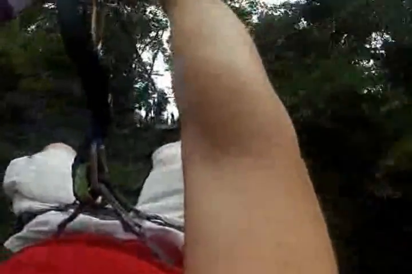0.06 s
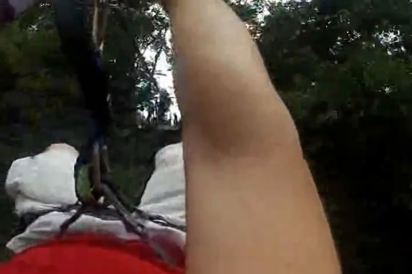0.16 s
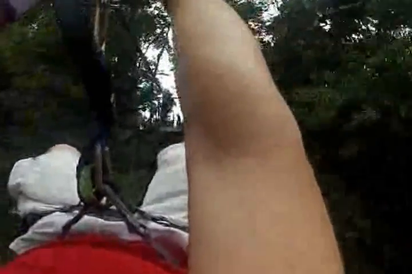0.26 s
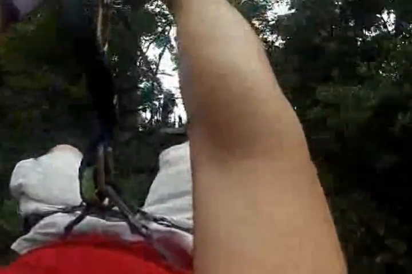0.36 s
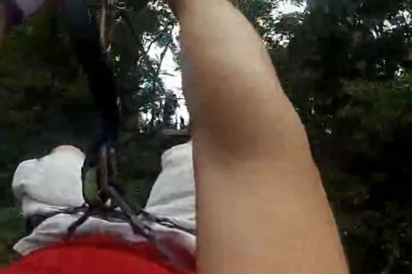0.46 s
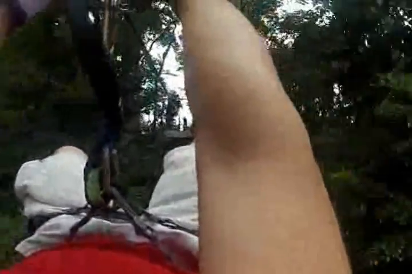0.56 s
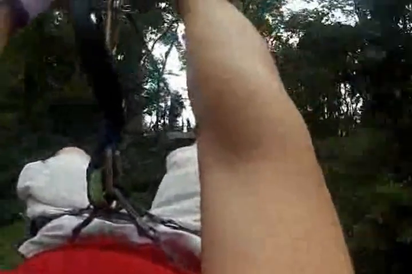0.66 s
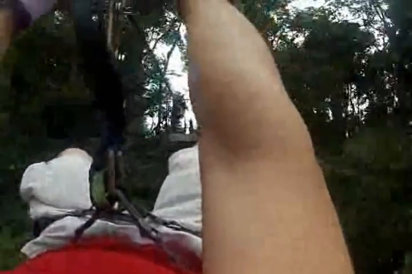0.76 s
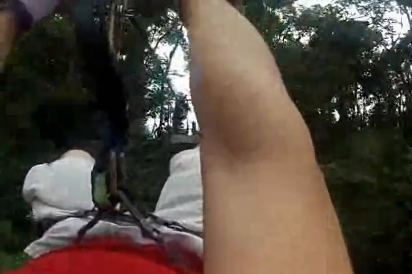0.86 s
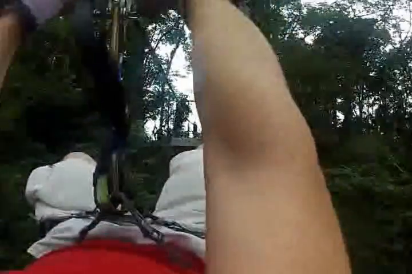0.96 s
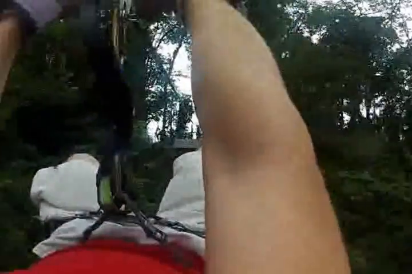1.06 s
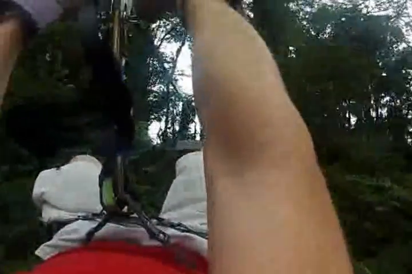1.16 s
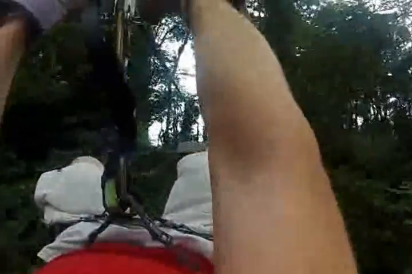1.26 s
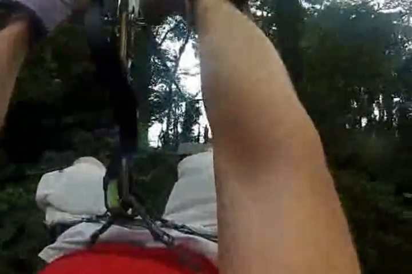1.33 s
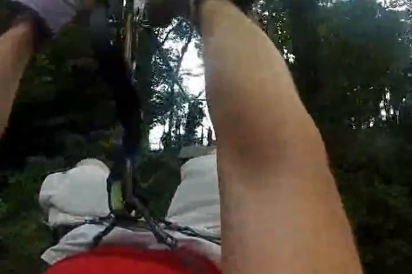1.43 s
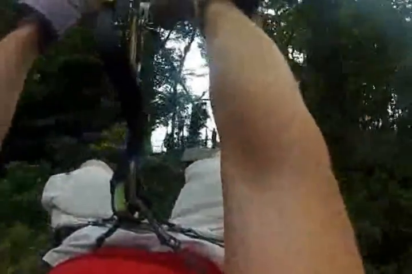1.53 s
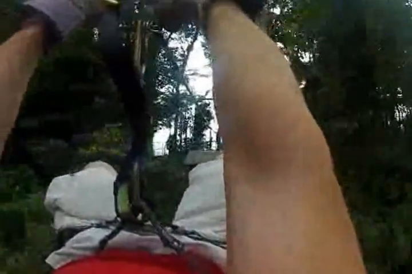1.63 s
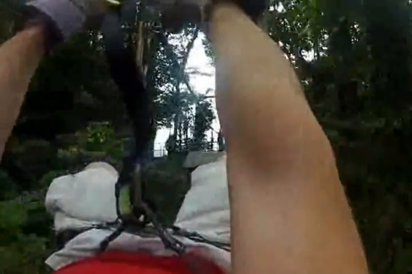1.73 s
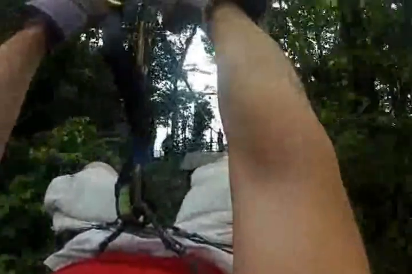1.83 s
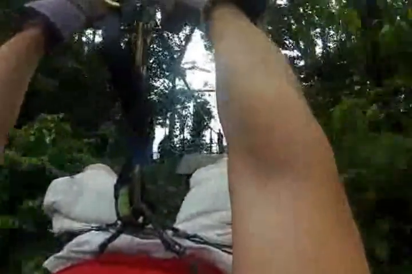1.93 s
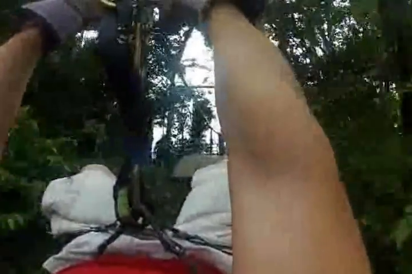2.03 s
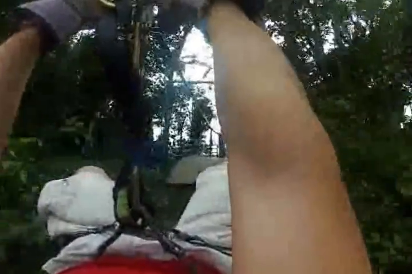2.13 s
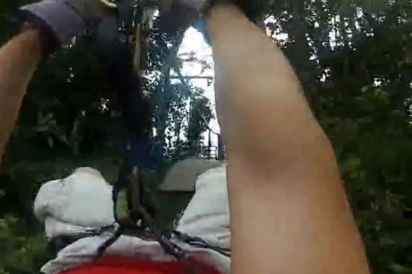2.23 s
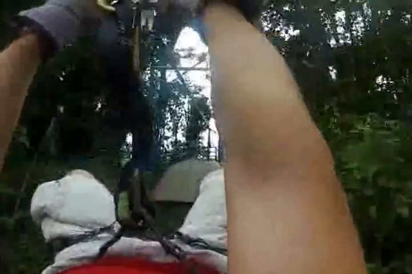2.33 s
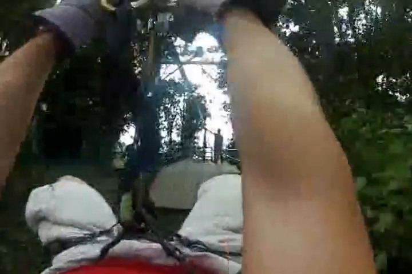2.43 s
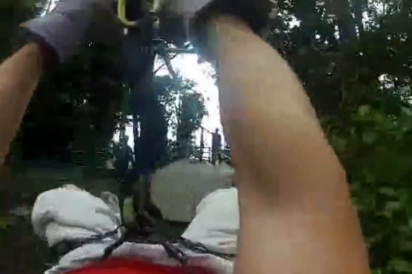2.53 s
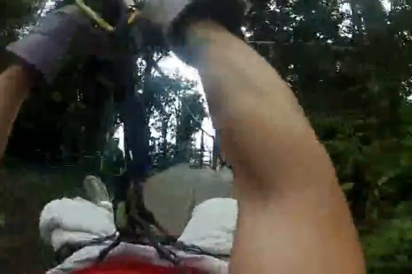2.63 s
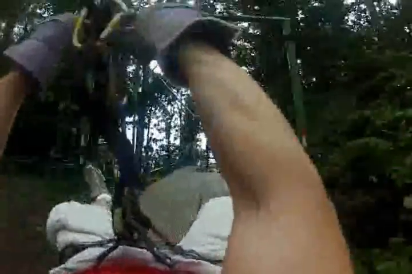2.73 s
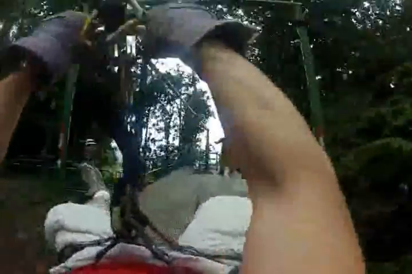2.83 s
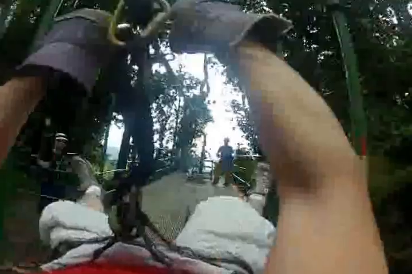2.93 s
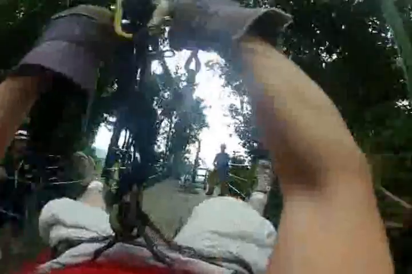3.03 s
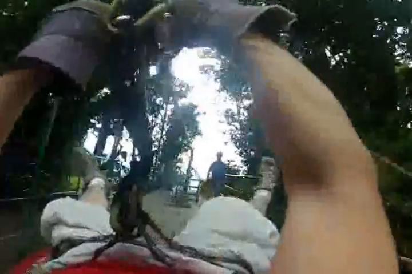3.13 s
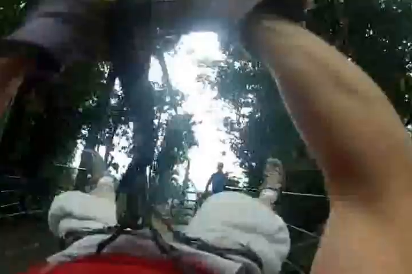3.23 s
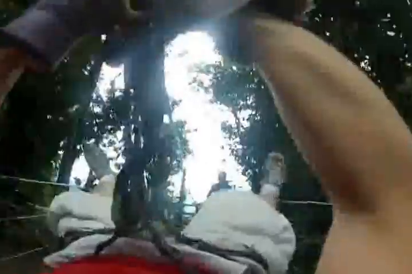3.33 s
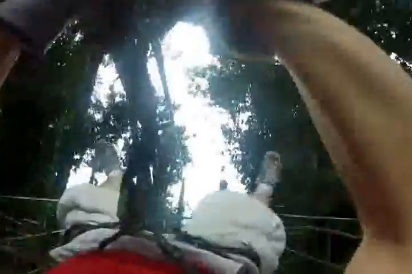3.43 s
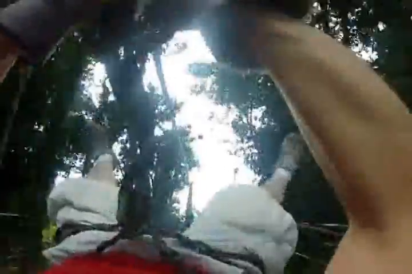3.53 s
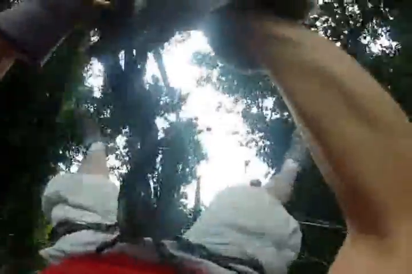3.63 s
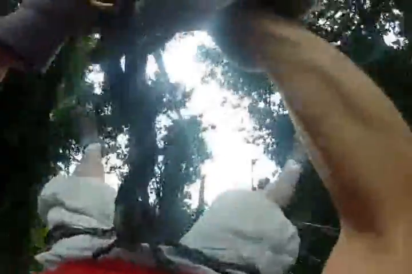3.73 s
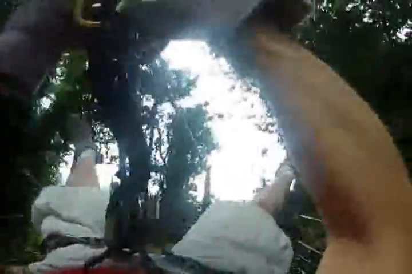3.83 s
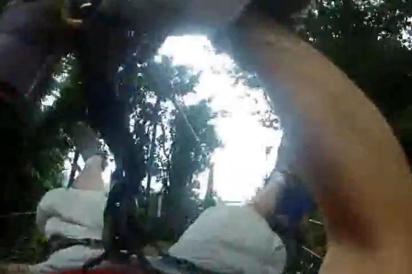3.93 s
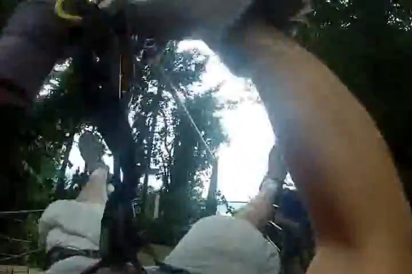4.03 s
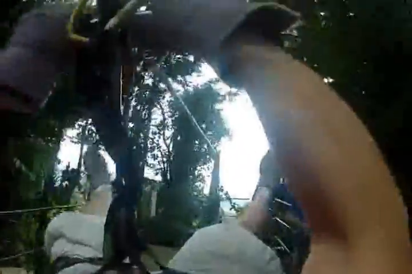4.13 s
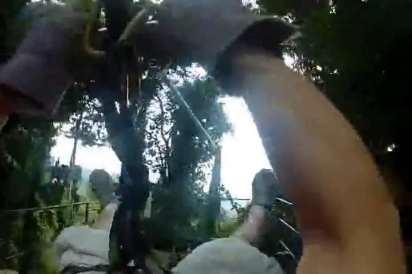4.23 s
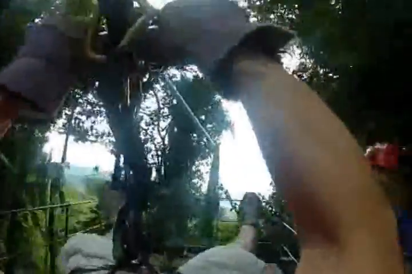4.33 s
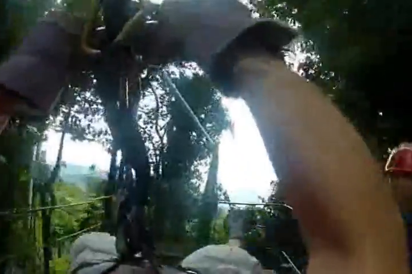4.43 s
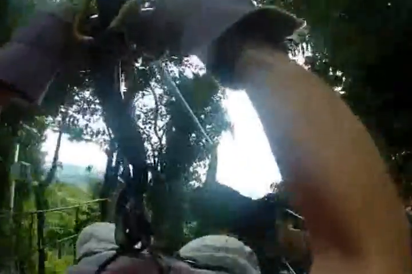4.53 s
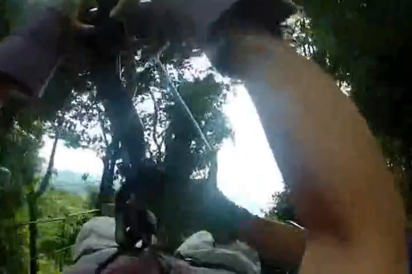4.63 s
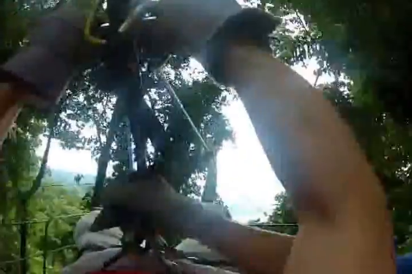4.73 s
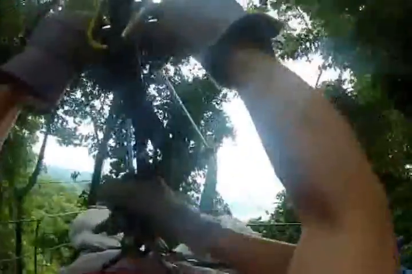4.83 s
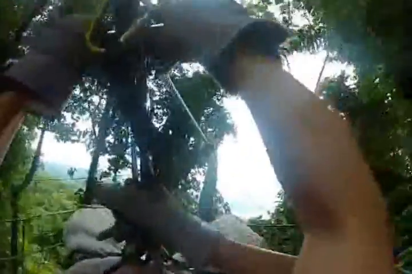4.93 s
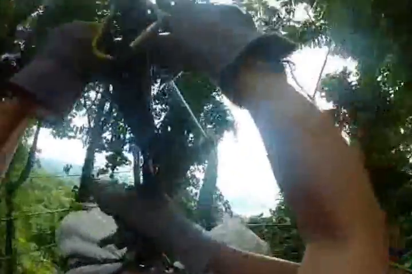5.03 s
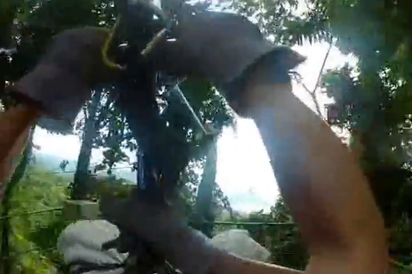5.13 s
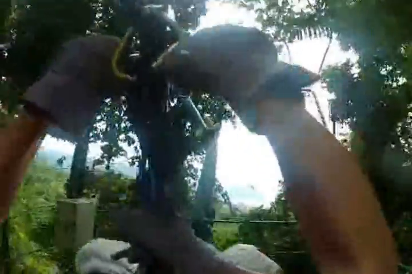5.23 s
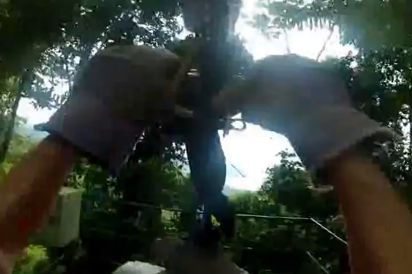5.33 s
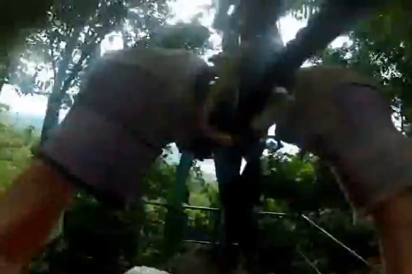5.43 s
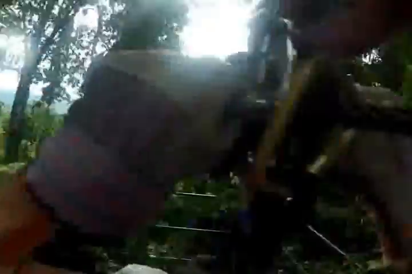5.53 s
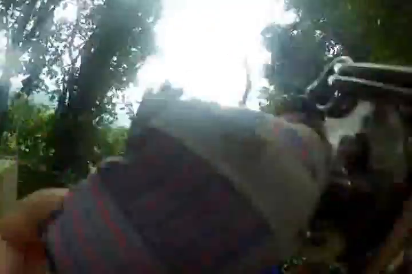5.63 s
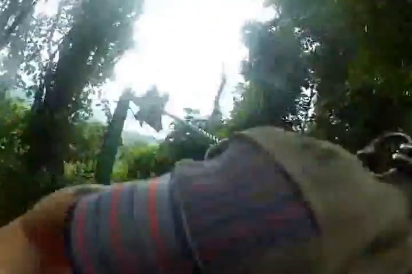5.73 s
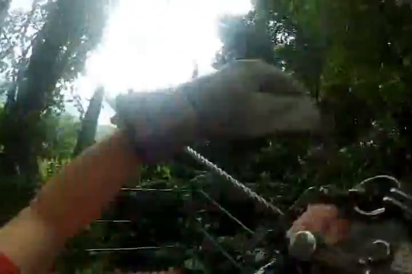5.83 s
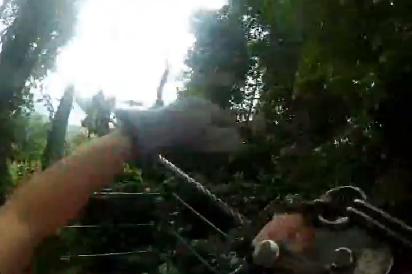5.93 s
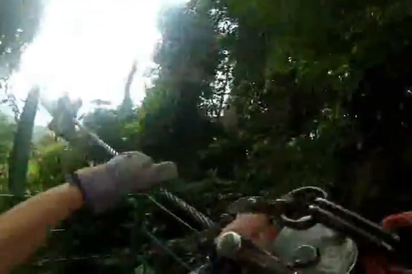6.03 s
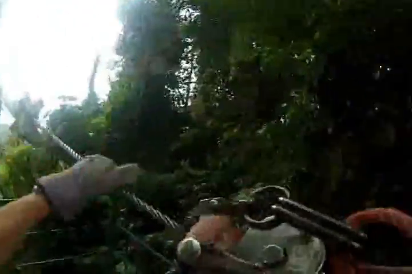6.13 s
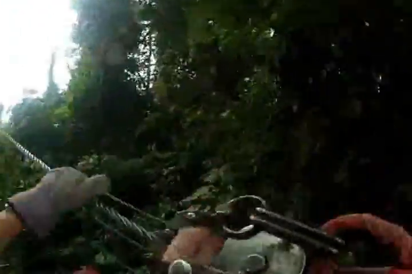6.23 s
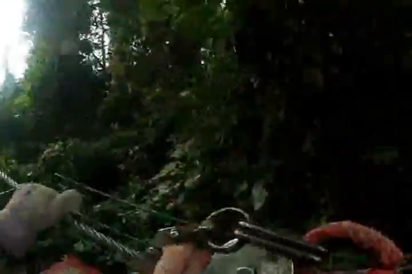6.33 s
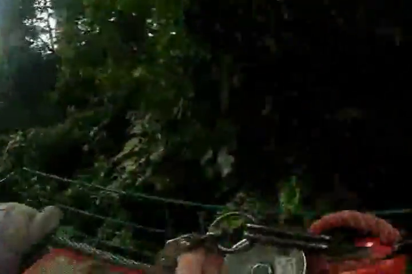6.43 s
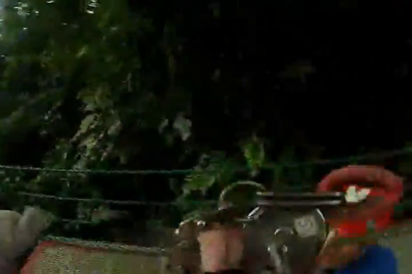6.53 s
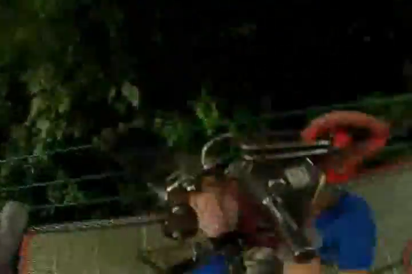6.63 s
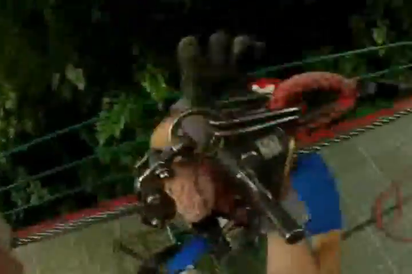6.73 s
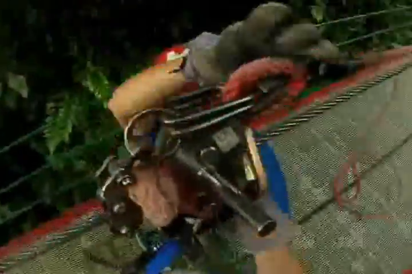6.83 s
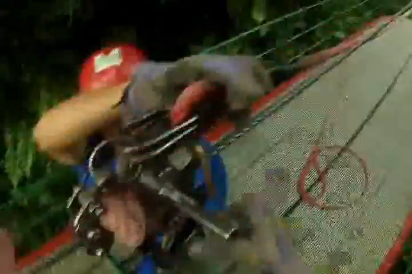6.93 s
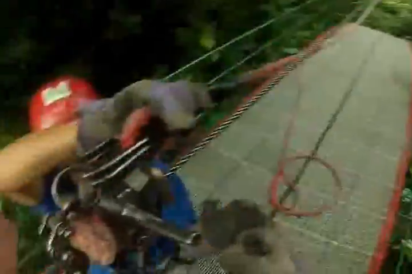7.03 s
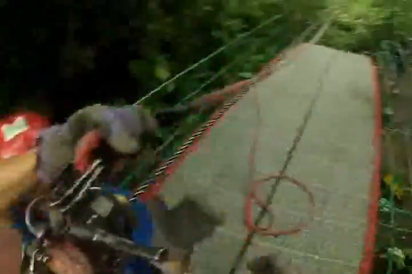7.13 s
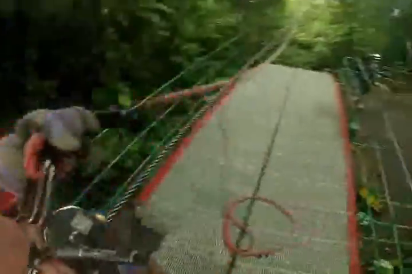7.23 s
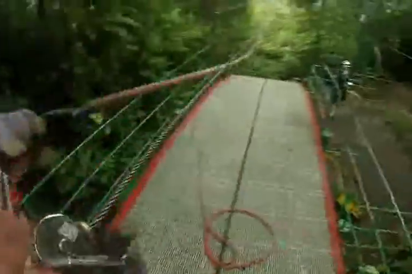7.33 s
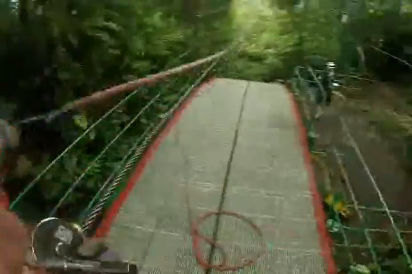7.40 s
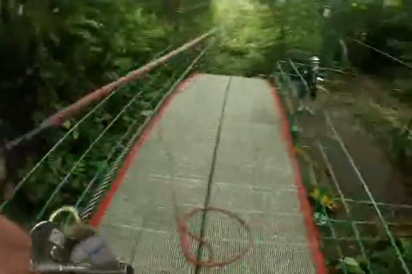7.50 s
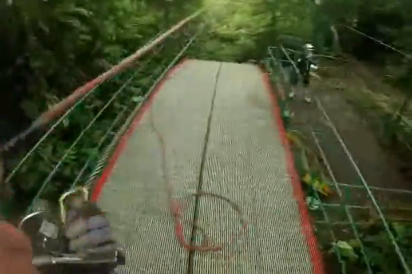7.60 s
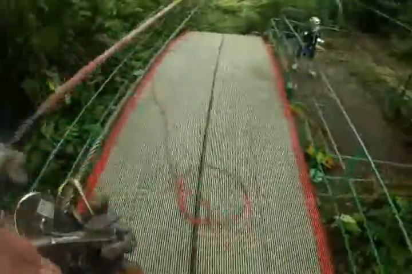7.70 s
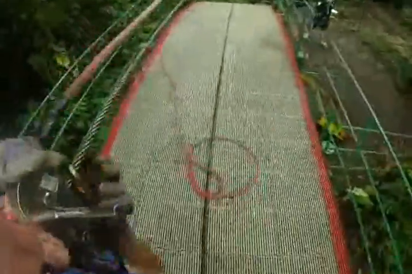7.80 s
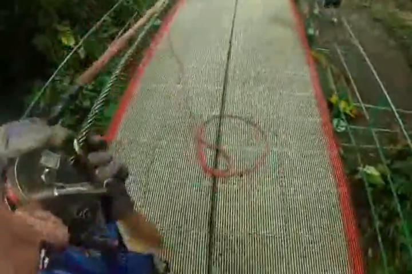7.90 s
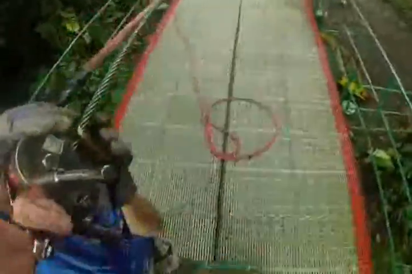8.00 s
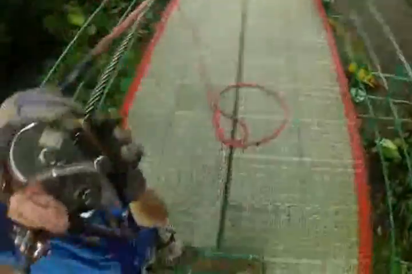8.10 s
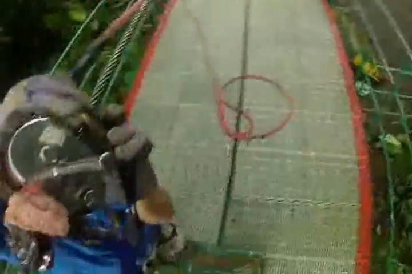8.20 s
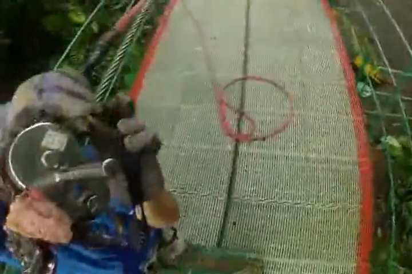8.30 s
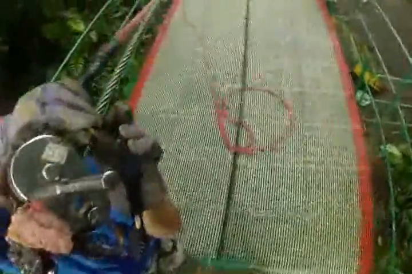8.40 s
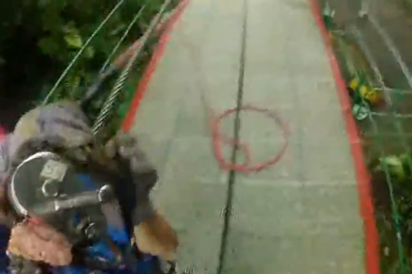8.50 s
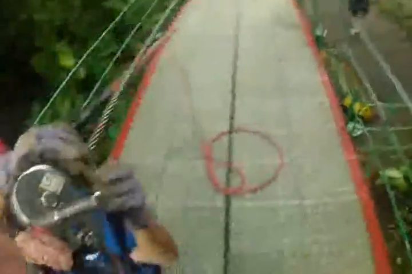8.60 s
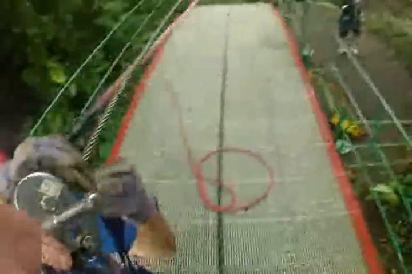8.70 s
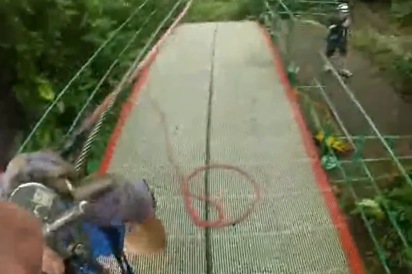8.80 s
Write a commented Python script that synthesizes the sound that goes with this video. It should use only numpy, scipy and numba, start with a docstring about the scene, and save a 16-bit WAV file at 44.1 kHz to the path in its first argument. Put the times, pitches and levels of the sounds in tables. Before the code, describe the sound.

From 0 s a pulley trolley rolls down a steel cable, its frame rattling, with strong low buffeting in the first half second. A wavering multi-toned whine slides slowly down as the wheels slow and the rattle weakens, until about 2.7 s. At 3.05 s the brake hits with a clunk and clack; a squeak follows near 3.3 s, and the loudest bangs and clicks cluster at 3.4-3.7 s. Rough metallic dragging swells, with a lower sagging squeak at 4.3 s, then dulls and dies by 5.7 s. A clip clicks at 5.9 s, and a strap creaks upward around 6.15 s. Until nearly 9 s there are gritty rubs, notably at 6.3 and 6.6 s, a faint squeak at 6.9 s, small ticks and dull helmet bumps over faint forest hush. Everything is close, boomy and boxed-in, with grainy, artificial treble.

```python
"""A pulley trolley rolls down a steel cable, rattling its frame and whining at the strand-passing rate, and slows.
It hits the brake with clunks, clicks and a squeak, and drags to a halt by sliding friction in the same frame.
Then straps rub and creak, clips tick and the helmet is bumped, over a faint forest hush.
The microphone sits in a closed case on the helmet, whose low resonances boom throughout; the recorder samples
coarsely and holds each value, which mirrors the sound into the treble."""
import sys
import numpy as np
from scipy import signal
from scipy.io import wavfile
from scipy.ndimage import uniform_filter1d, map_coordinates
from numba import njit

SR = 44100
rng = np.random.default_rng(int(sys.argv[2]) if len(sys.argv) > 2 else 0)


def how_loud(loudness_db):
    """Turn decibels into a plain amplitude multiplier (0 dB gives 1, 20 dB gives 10)."""
    steps = np.asarray(loudness_db, float) / 20
    return 10 ** steps


def to_wav(s):
    """Save 16-bit WAV."""
    ch = np.atleast_2d(s).T  # columns
    pcm = np.round(np.clip(ch, -1, 1) * 32767)  # PCM
    wavfile.write(sys.argv[1], SR, pcm.astype(np.int16))


N = 390723


@njit
def svf(x, hz, width):
    """State-variable band-pass: two integrators in a loop, gain 1 at a centre that may move."""
    y, band_state, low_state = np.empty(len(x)), 0., 0.
    for i in range(len(x)):
        g, damping = np.tan(np.pi * hz[i] / SR), width / hz[i]
        v = (band_state + g * (x[i] - low_state)) / (1 + g * (g + damping))
        band_state = 2 * v - band_state
        low_state = low_state + 2 * g * v
        y[i] = damping * v
    return y


def band(x, hz, width):
    """Single resonance, fixed or moving, of the given bandwidth in Hz."""
    return svf(x, hz + np.zeros(len(x)), 1. * width)


def unit(x):
    """Normalisation to rms 1."""
    return x / np.sqrt(np.mean(x ** 2))


def walk(rate):
    """Slow random modulation: normal values held 1 / rate s and slewed by two moving averages."""
    hold = int(SR / rate)
    steps = np.repeat(rng.standard_normal(N // hold + 1), hold)
    slewed = uniform_filter1d(uniform_filter1d(steps, hold), hold)
    return 1.294 * slewed[:N]  # offsets the loss of spread in averaging


def seconds():
    """Time axis of the whole scene, in s."""
    return np.arange(N) / SR


def columns(table):
    """Linear interpolation of table columns, after a mask that fades over 0.1 s outside the table."""
    s, *cols = np.transpose(table)
    t = seconds()
    inside = np.interp(t, [s[0] - .1, s[0], s[-1], s[-1] + .1], [0, 1, 1, 0])
    return inside, *[np.interp(t, s, c) for c in cols]


def grit(rate, spread_db):
    """Contact noise: its level wanders as small irregular contacts come and go."""
    return rng.standard_normal(N) * how_loud(spread_db * walk(rate))


def add(out, s, piece):
    """Superposition of a piece from s seconds on."""
    i = int(s * SR)
    out[i:i + len(piece)] += piece[:N - i]


RISE_DB_PER_S, FALL_DB_PER_S = 522, 750


def stroke(s, hold, db):
    """Exponential onset and decay: gain that rises to db at s, holds, and falls away."""
    t = seconds()
    return how_loud(db - RISE_DB_PER_S * np.maximum(s - t, 0) - FALL_DB_PER_S * np.maximum(t - s - hold, 0))


# modes of trolley, cable and rigging as heard in the case; levels are for a mode 1000 Hz wide:
# f/Hz, width/Hz, rolling level/dB, dragging level/dB, scraping level/dB
FRAME_MODES = [(895, 150, -6.5, -12.5, 0.5), (1040, 145, -3, -9.5, 2.5), (1430, 254, -8, -9.5, -11),
               (1652, 230, -4.5, -2, -4.5), (2085, 149, 0.5, 1.5, 1.5), (2403, 248, -1, -2.5, -8.5),
               (2940, 107, -0.5, -7, -13.5), (3150, 97, -2, -5, -11), (3650, 580, -11, -16.5, -20.5),
               (613, 410, -17, -19.5, -5), (2750, 1800, -18.5, -19, -22)]


def frame(push, column, flicker_db, low_db=0, high_db=0):
    """Modal superposition: the push rings every mode; each swells, fades and drifts on its own."""
    out = 0
    for k, mode in enumerate(FRAME_MODES):
        hz, width = mode[:2]
        db = mode[column] + flicker_db * walk(9) + low_db * (hz < 1500) + high_db * (hz > 2600)
        ring = unit(band(push, hz * (1 + 0.013 * walk(4)), width))
        out = out + (-1) ** k * how_loud(db) * ring * np.sqrt(width / 1000)
    return out


# rolling wheels, for trolley() and whine(): t/s, rattle level/dB, whine level relative to the rattle/dB
ROLLING = [(0, -34, -14), (.3, -36.5, -18), (.55, -33, -7.5), (1.1, -36.5, -6.5), (1.41, -39, -8),
           (1.55, -42, -17.5), (1.9, -43, -6), (2.44, -45.5, -5.5), (2.55, -40.5, -20), (2.8, -42.5, -3),
           (3.0, -46, -21)]
HUM_DB, HUM_RISE_DB_PER_S = -4.5, 1.5  # hum relative to the rattle, at the start


def trolley():
    """Forced vibration: rolling wheels rattle the frame, and a hum travels down the straps to the case."""
    inside, db, _ = columns(ROLLING)
    t = seconds()
    low_db = np.interp(t, [.2, 2.2], [-3, 2.5])  # slower wheels rattle lower
    rattle = unit(frame(grit(300, 1.03), column=2, flicker_db=1.2, low_db=low_db))
    hum = how_loud(HUM_DB + HUM_RISE_DB_PER_S * t) * unit(band(grit(30.3, 0.87), 151.0, 25.5))
    return inside * how_loud(db) * (rattle + hum)


# whine partials: multiple of the strand rate, early level/dB, late level/dB
WHINE_PARTIALS = [(2, -1.5, 3), (3, -5.5, -11), (4, -1, -8.5), (5, -2, -14)]
# strands passing the wheels: rate at the start, steady slowing, a surge on the last stretch
STRAND_HZ, SLOWING_HZ_PER_S = 633.7, 54
SURGE_S, SURGE_HZ_PER_S = 2.55, 240


def whine():
    """Periodic excitation: wheels sing on multiples of the strand rate; the balance later shifts to the lowest."""
    inside, db, relative_db = columns(ROLLING)
    t = seconds()
    hz = STRAND_HZ - SLOWING_HZ_PER_S * t + SURGE_HZ_PER_S * np.maximum(t - SURGE_S, 0)
    waver = 1 + 0.0039 * walk(29.95) + 0.00955 * walk(150)
    phase = 2 * np.pi * np.cumsum(hz * waver) / SR
    late = np.clip((t - 1.1) / .5, 0, 1)
    tones = 0
    for multiple, early_db, late_db in WHINE_PARTIALS:
        partial_db = early_db + (late_db - early_db) * late + 2.6 * walk(16) + 3.9 * walk(90)
        tones = tones + how_loud(partial_db) * np.sin(multiple * phase)
    return inside * how_loud(db + relative_db) * tones


# dragging brake: t/s, level/dB
DRAGGING = [(2.9, -48), (3.0, -41), (3.3, -37.5), (3.7, -34.5), (4.11, -37), (4.55, -39), (4.72, -45),
            (4.9, -44), (5.2, -45), (5.58, -52), (5.62, -62.5), (5.76, -69)]
DRAG_LOW_DB, DRAG_HIGH_DB = 3.5, 4.5  # boost of low and high modes as the brake bites
DULL_LOW_DB_PER_S, DULL_HIGH_DB_PER_S = 1.3, 2  # both weaken as it slows


def drag():
    """Sliding friction: the brake's rough contact noise rings the same frame."""
    inside, db = columns(DRAGGING)
    start, end = DRAGGING[0][0], DRAGGING[-1][0]
    since = np.clip(seconds() - start, 0, end - start)
    low_db = DRAG_LOW_DB - DULL_LOW_DB_PER_S * since
    high_db = DRAG_HIGH_DB - DULL_HIGH_DB_PER_S * since
    push = grit(250, 1.62) * how_loud(0.98 * walk(30))
    return inside * how_loud(db) * unit(frame(push, column=3, flicker_db=0.97, low_db=low_db, high_db=high_db))


# squeaks of metal on metal, before flutter, waver and sag: t/s, hold/s, level/dB, f/Hz
SQUEAKS = [(3.267, 0.036, -45, 1302), (4.328, .1, -47.5, 1035), (6.92, .015, -70, 2660)]
SAG_PER_S = .35  # fraction of the pitch


def squeaks():
    """Frictional tones: brief wavering sines that sag in pitch."""
    t = seconds()
    waver = 1 + .004 * walk(30) + 0.012 * walk(150)
    flutter = how_loud(4.3 * walk(90))
    out = 0
    for s, hold, db, hz in SQUEAKS:
        sag = 1 - SAG_PER_S * np.clip(t - s, -.2, .4)
        phase = 2 * np.pi * np.cumsum(hz * waver * sag) / SR
        out = out + stroke(s, hold, db) * np.sin(phase)
    return flutter * out


# shaking and wind that reach the case: t/s, boom level/dB
SHAKING = [(0, -30.5), (.3, -33.5), (.54, -40), (1.2, -39), (2.2, -38.5), (2.86, -44), (3.3, -39.5),
           (3.5, -29.5), (3.68, -34.5), (3.87, -54), (4.12, -40), (4.54, -63.5), (4.93, -53), (5.15, -61),
           (5.9, -58.5), (6.25, -48.5), (6.44, -59), (6.81, -42.5), (7.0, -57.5), (8.04, -60.5),
           (8.64, -57.5), (8.86, -51)]
# low modes of the case and its mount: f/Hz, width/Hz, level/dB
CASE_LOWER = [(101, 83, 5.5), (143.2, 49, 0.5), (219.2, 17.8, -8)]
# upper modes of the case, for shake() and bumps(): f/Hz, width/Hz, level/dB
CASE_UPPER = [(243.6, 104, 4), (377.3, 37, -1)]
# upper level at a -40 dB boom; dB per dB of the averaged boom; averaging span
UPPER_DB, UPPER_FOLLOWS, UPPER_SPAN_S = -51, 0.78, .45


def case_ring(push, modes):
    """Modal superposition in the case, each mode a resonance passed twice."""
    return unit(sum(how_loud(db) * unit(band(band(push, hz, width), hz, width)) for hz, width, db in modes))


def shake():
    """Random excitation: buffeting rings the low modes of the case; the upper ones follow its average level."""
    push = grit(40, 2.4) * how_loud(2.1 * walk(13))
    db = columns(SHAKING)[1]
    over_db = uniform_filter1d(db, int(UPPER_SPAN_S * SR)) + 40
    upper_gain = how_loud(UPPER_DB + UPPER_FOLLOWS * over_db)
    return how_loud(db) * case_ring(push, CASE_LOWER) + upper_gain * case_ring(push, CASE_UPPER)


# knocks through the helmet: t/s, peak level of the main tone/dB, f/Hz, 60 dB decay time (at least 0.02)/s
KNOCKS = [(2.702, -25.5, 138, 0.084), (2.8, -36, 124, 0.053), (2.87, -52, 126, 0.053),
          (3.047, -15, 130, .068), (3.107, -23.5, 105, .055), (3.237, -30.5, 142, 0.18),
          (3.38, -26, 89.5, .039), (3.416, -18, 120, 0.042), (3.439, -19, 197, 0.035),
          (3.479, -5.5, 168, 0.029), (3.508, -20.5, 162.5, .06), (3.56, -19.5, 167, 0.055),
          (3.622, -17, 131, 0.046), (3.658, -24, 109, 0.026), (3.793, -36, 89.5, .065),
          (3.895, -29, 120, .052), (4.064, -39, 94, 0.077), (4.179, -31.5, 153, 0.05),
          (4.26, -29, 133, .082), (4.764, -38.5, 144, 0.12), (4.796, -42, 104, .06),
          (4.906, -42, 123, 0.057), (4.955, -39, 90, 0.068), (5.067, -41, 121, 0.073),
          (5.409, -42, 131, .12), (5.497, -42, 129, .038), (5.724, -40, 158, .036), (5.949, -39.5, 89, .05),
          (5.987, -31.5, 129, 0.059), (6.206, -33.5, 106.3, 0.054), (6.248, -43.5, 109, 0.034),
          (6.348, -34.5, 101, .069), (6.385, -31, 131, .049), (6.693, -36.5, 116, 0.22),
          (6.867, -33, 103, .06), (6.881, -26, 145, 0.036), (6.942, -34, 112, 0.046),
          (7.246, -30, 105, 0.052), (7.34, -44.5, 119, .075), (7.426, -46.5, 152, 0.05),
          (7.553, -27.5, 118, 0.042), (7.664, -48, 125, 0.054), (8.198, -33, 133, 0.057),
          (8.629, -45, 94, 0.062), (8.737, -28, 136, 0.035), (8.809, -48, 159, .06)]
SWELL_S, EDGE_DB = .0053, -13.5


def bumps():
    """Impulse response: each knock swells and rings out, rocks the helmet and snaps the upper case tones."""
    out, t = np.zeros(N), np.arange(SR // 4) / SR
    snap = sum(how_loud(g) * np.sin(2 * np.pi * f * t) for f, _, g in CASE_UPPER)
    edge = snap * t / 0.0056 * np.exp(1 - t / 0.0044)
    for s, db, hz, decay in KNOCKS:
        shape = (1 - np.exp(-t / SWELL_S)) ** 2 * np.exp(-np.log(1000) * t / max(decay, .02))
        body = shape * np.sin(2 * np.pi * hz * t)
        # the whole helmet rocks: deep bass
        shove = 0.35 * shape / shape.max() * np.sin(2 * np.pi * 68 * t)
        knock = body / np.abs(body).max() + shove + how_loud(EDGE_DB) * edge
        add(out, s + .0025, how_loud(db) * knock)
    return out


# metal and plastic clicks: t/s, approximate peak level/dB, f/Hz, 26 dB decay time (at least 0.003)/s,
# share of broad crack/0-1
CLICKS = [(3.048, -16, 1800, 0.013, .0), (3.071, -23.5, 2920, 0.056, 0.25),
          (3.331, -22.5, 2360, 0.096, 0.4), (3.48, -13, 883, 0.04, 0.14), (3.498, -14.5, 2130, 0.016, 0),
          (3.55, -7.5, 1720, .011, 0.2), (3.626, -13, 1720, 0.01, 0), (4.115, -20, 2820, 0.01, 0.63),
          (5.893, -33.5, 2240, 0.061, 0.38), (5.91, -21.5, 2830, 0.02, 0.7), (6.209, -51.5, 2150, .019, .4),
          (6.302, -47, 1084, .019, 0.6), (6.498, -42.5, 3350, 0.021, .5), (6.506, -47, 2250, .03, 0.2),
          (6.645, -44.5, 1090, 0.04, 0.66), (6.887, -46, 738, 0.022, 0.34), (7.141, -53, 926, .016, 0.5),
          (7.199, -50, 899, 0.014, 0.48), (7.259, -45, 1040, 0.021, 0.3), (7.627, -37.5, 2210, 0.014, 0.56),
          (7.71, -51.5, 883, 0.1, .05), (7.788, -53.5, 950, .016, 0.7), (7.853, -51, 1120, .016, .5),
          (7.892, -52, 900, .016, 0.66), (7.964, -41.5, 3650, .027, 0.53), (8.203, -50.5, 912, 0.018, .2),
          (8.721, -47.5, 880, 0.013, 0.26), (8.743, -49.5, 729, 0.015, .2)]
SHELL_HZ = 880
SHELL_DB, SHELL_LOSS_DB = -1, 25.5  # helmet shell under a dull click; loss towards a pure crack


def clicks():
    """Transient excitation: a burst of tiny contacts, partly through one short ring, partly broad."""
    out, t = np.zeros(N), np.arange(SR // 8) / SR
    for s, db, hz, length, broad in CLICKS:
        envelope = (1 - np.exp(-t / 0.0019)) * np.exp(-3 * t / max(length, .003))
        burst = rng.standard_normal(len(t)) * envelope
        ring = unit(band(band(burst, hz, 500.), hz, 900.))
        crack = unit(band(band(burst, 2300., 3200.), 2300., 4500.))
        shell = how_loud(SHELL_DB - SHELL_LOSS_DB * broad) * unit(band(burst, SHELL_HZ, 140.0))
        click = (1 - broad) * ring + broad * crack + shell
        # peaks stand about four times over the early rms
        crest = 4 * np.sqrt(np.mean(click[:SR // 100] ** 2))
        add(out, s, how_loud(db) * click / crest)
    return out


# straps and gloves scraping: t/s, hold/s, level/dB
SCRAPES = [(5.949, .05, -67), (6.21, 0.0087, -65), (6.321, 0.025, -52), (6.392, 0.043, -67),
           (6.588, 0.29, -57), (6.959, 0.032, -57.5), (7.068, 0.08, -62.5), (7.2, 0.092, -65.5),
           (7.34, .01, -65), (7.448, 0.14, -69.5), (7.636, 0.07, -64.5), (7.85, 0.093, -74),
           (7.97, 0.075, -67.5), (8.359, .025, -59.5), (8.73, 0.009, -76)]


def rub():
    """Scraping friction: gritty strokes of straps and gloves ring the rigging."""
    push = grit(200, 2.2) * how_loud(1.2 * walk(36))
    return sum(stroke(*row) for row in SCRAPES) * unit(frame(push, column=4, flicker_db=2.0))


# a strap creaks against the case: t/s, f/Hz, level/dB
CREAKING = [(6.08, 233, -76.5), (6.11, 249, -56), (6.15, 372, -46.5), (6.19, 420, -53), (6.22, 398, -72)]


def creak():
    """Stick-slip friction: rough noise in a gliding, mostly rising resonance."""
    inside, hz, db = columns(CREAKING)
    return inside * how_loud(db) * unit(band(band(grit(80, 1.6), hz, 89.0), hz, 126.0))


HUSH_DB = -71.5


def hush():
    """Stationary broadband noise: the faint hush of the forest."""
    return how_loud(HUSH_DB) * unit(band(rng.standard_normal(N), 800.0, 2500.))


def scene():
    """Linear superposition of all sources."""
    rolling = trolley() + whine()
    braking = drag() + squeaks()
    helmet = shake() + bumps() + clicks()
    straps = rub() + creak()
    return (rolling + braking + helmet + straps + hush())[None]


def low_pass(x):
    """Removes everything above the highest recorded frequency."""
    return signal.sosfilt(signal.butter(12, 15960, fs=SR, output="sos"), x)


HOLD_HZ = 7993.1


def record(dry):
    """Zero-order hold: after a bass cut, coarse samples held until the next mirror the sound into the treble."""
    x = signal.sosfilt(signal.butter(4, 48, "high", fs=SR, output="sos"), dry)
    x = signal.sosfiltfilt(signal.butter(6, 4200, fs=SR, output="sos"), x)
    held = np.floor(np.arange(N) * HOLD_HZ / SR) * SR / HOLD_HZ  # sample position each output keeps
    x = map_coordinates(x[0], [held], order=3)[None]
    x = signal.sosfiltfilt(signal.ellip(10, .1, 50, 15740, fs=SR, output="sos"), x)
    return low_pass(x)


dry = scene()
out = record(dry)
to_wav(out)
```